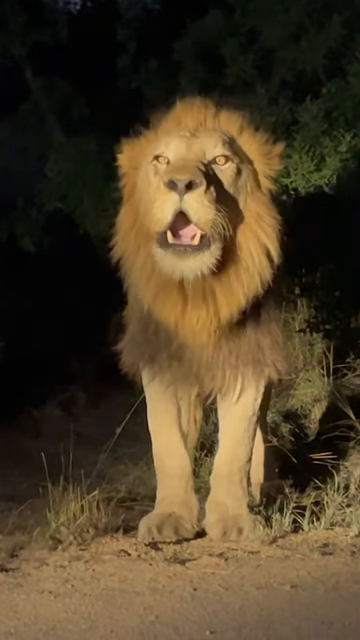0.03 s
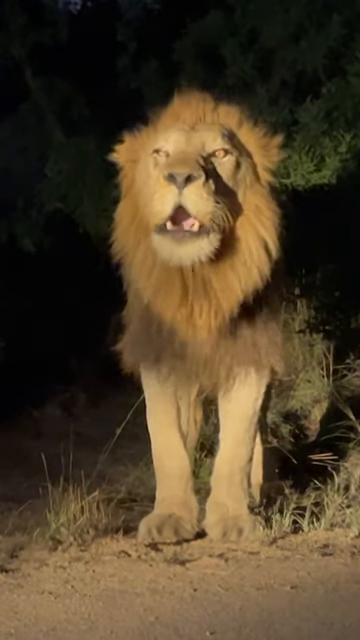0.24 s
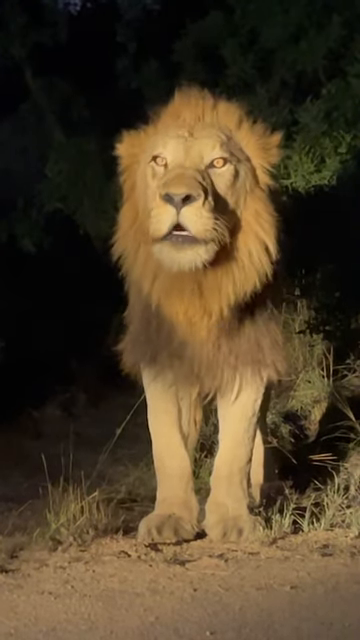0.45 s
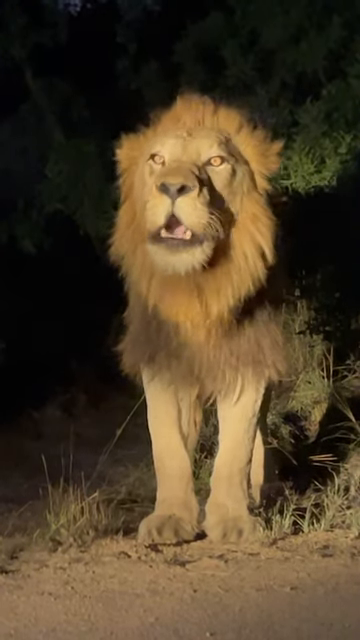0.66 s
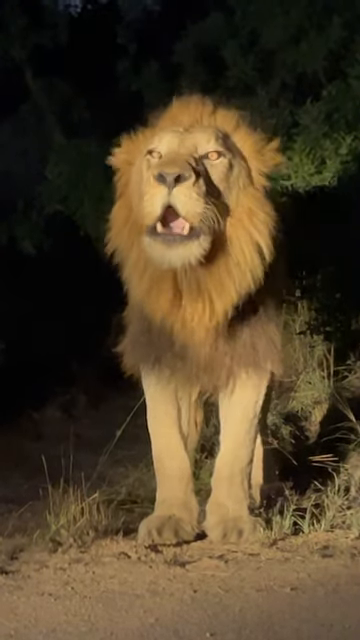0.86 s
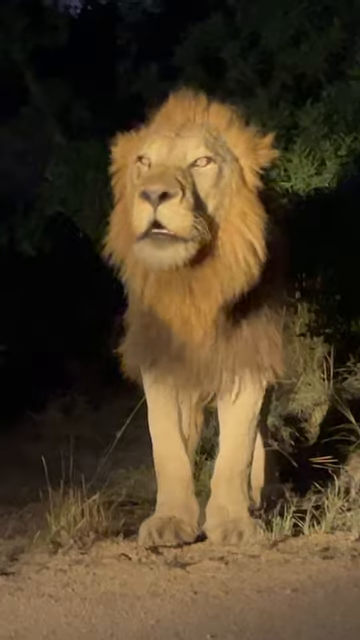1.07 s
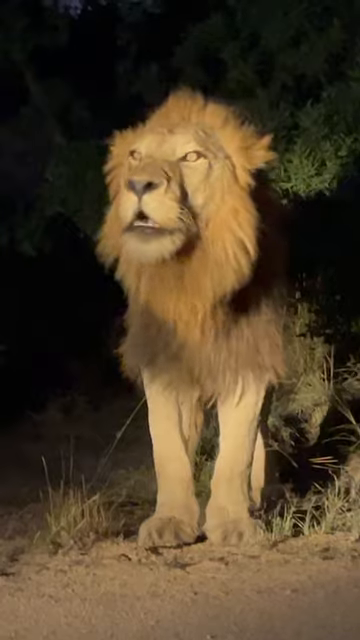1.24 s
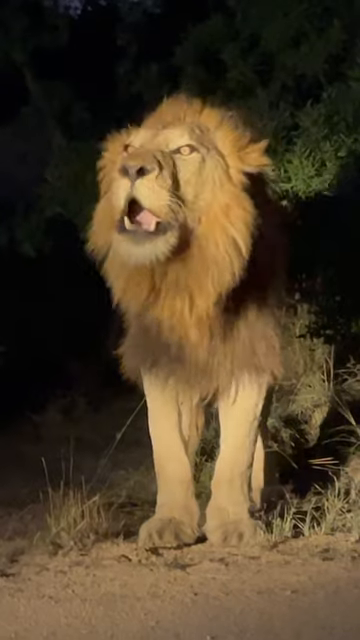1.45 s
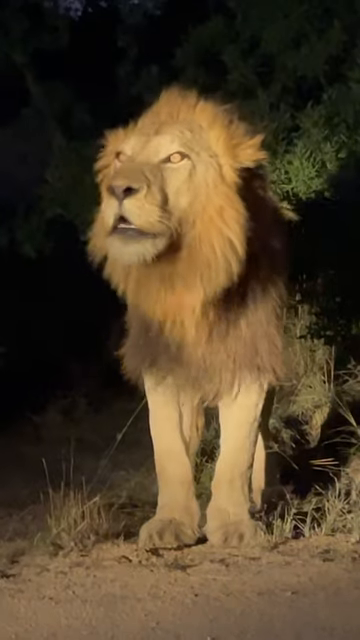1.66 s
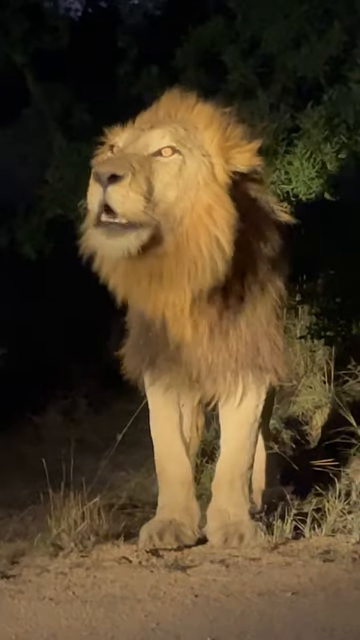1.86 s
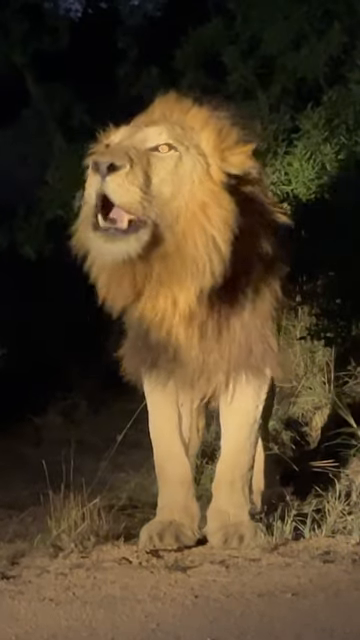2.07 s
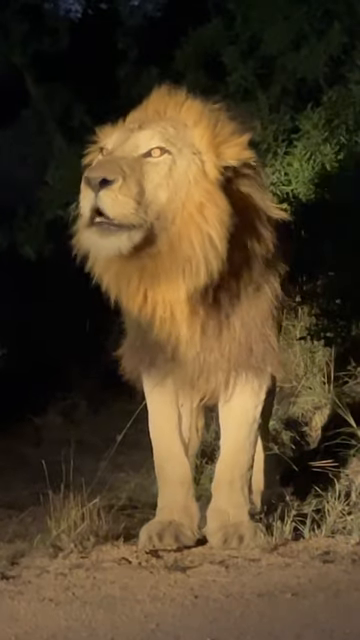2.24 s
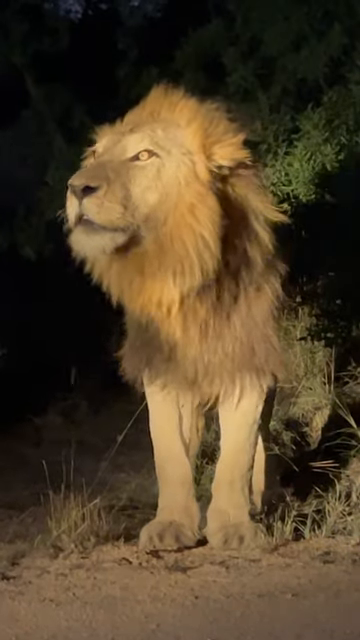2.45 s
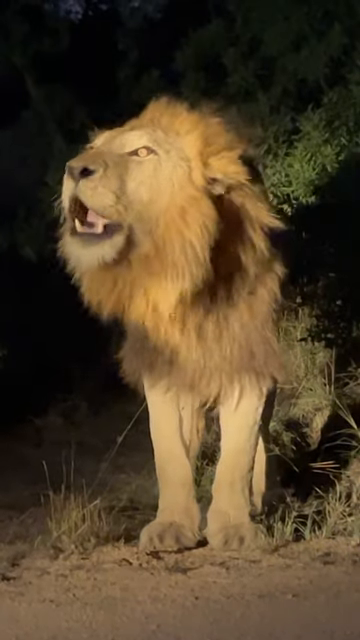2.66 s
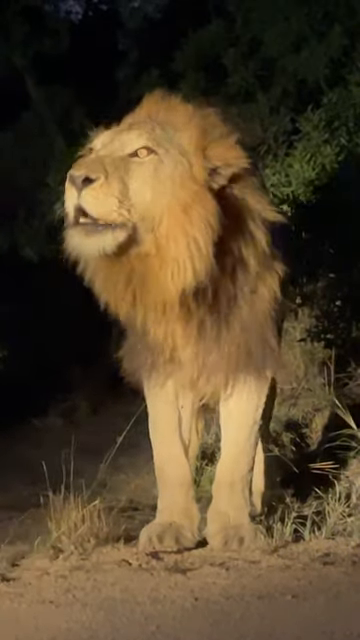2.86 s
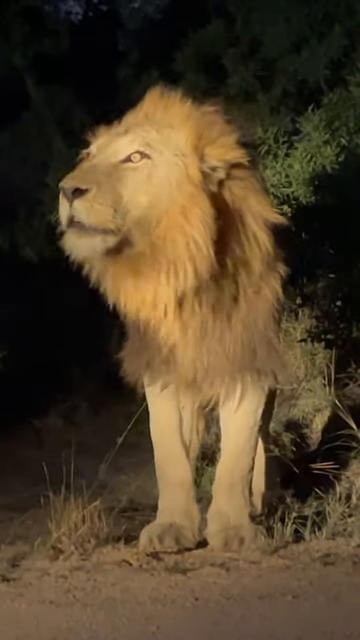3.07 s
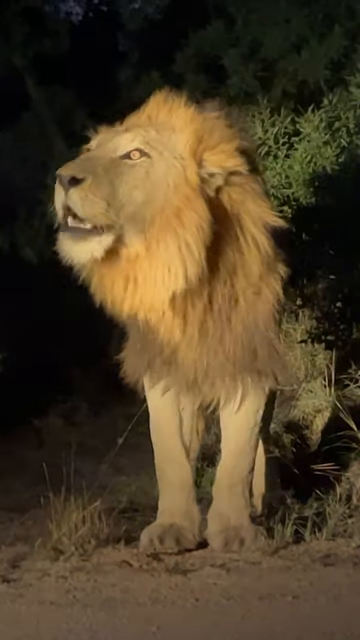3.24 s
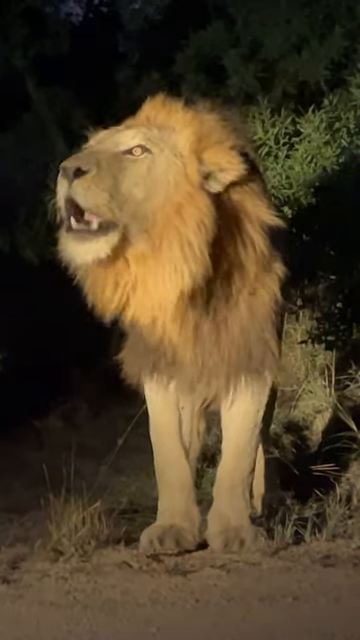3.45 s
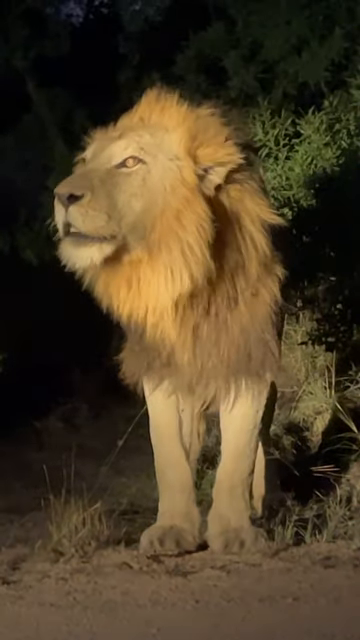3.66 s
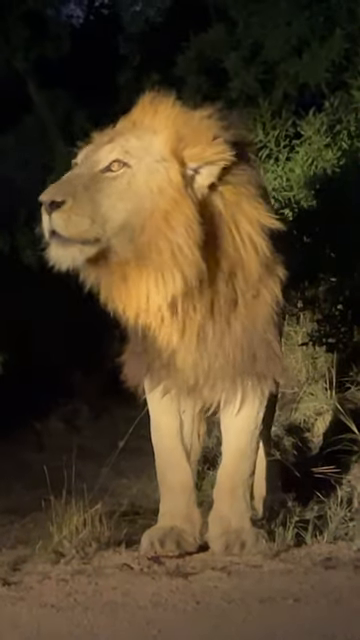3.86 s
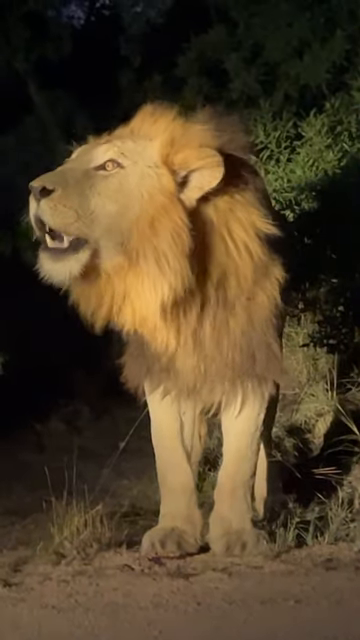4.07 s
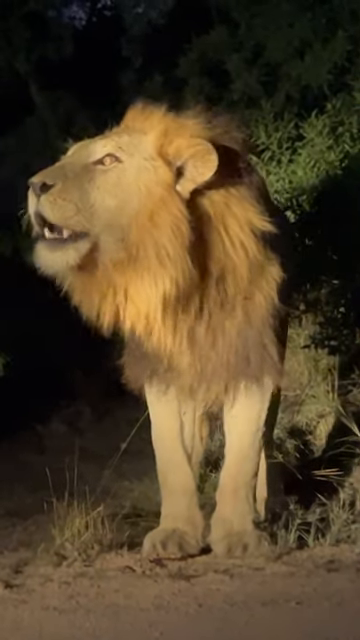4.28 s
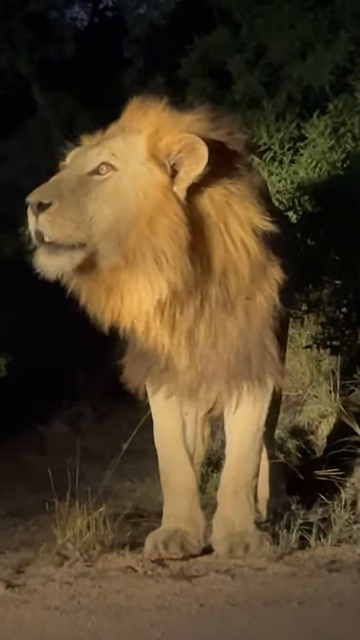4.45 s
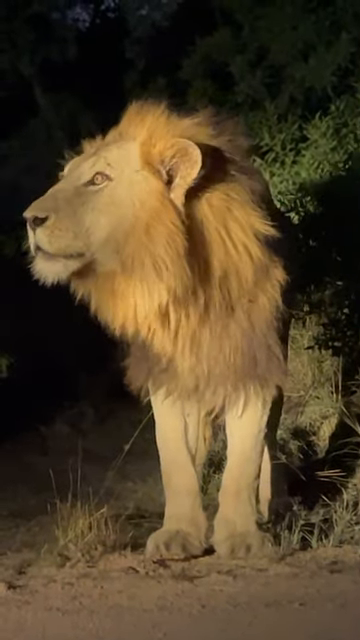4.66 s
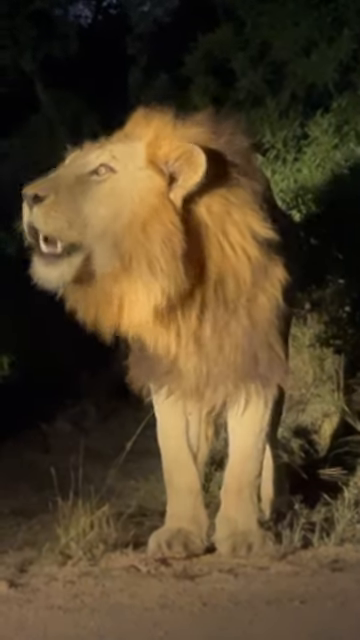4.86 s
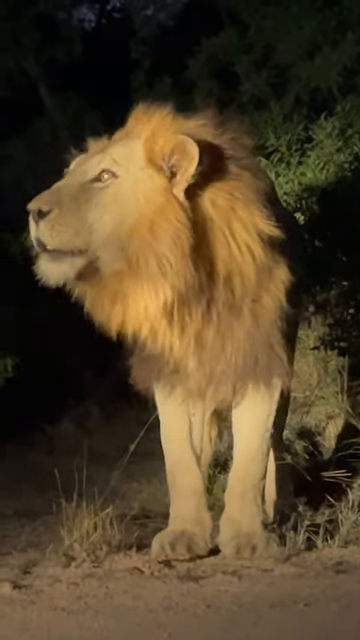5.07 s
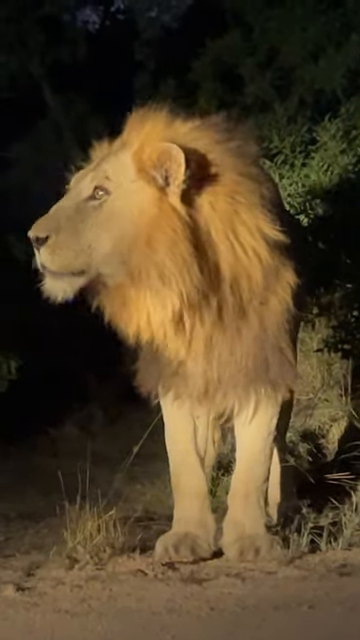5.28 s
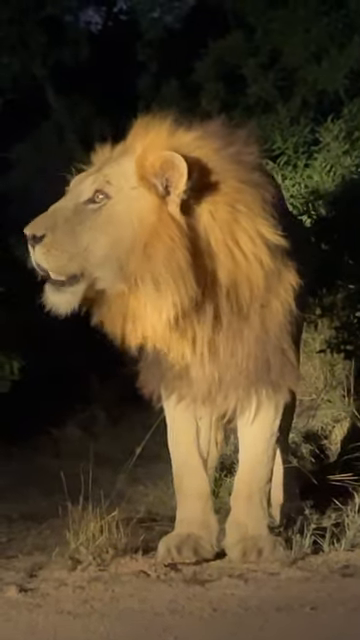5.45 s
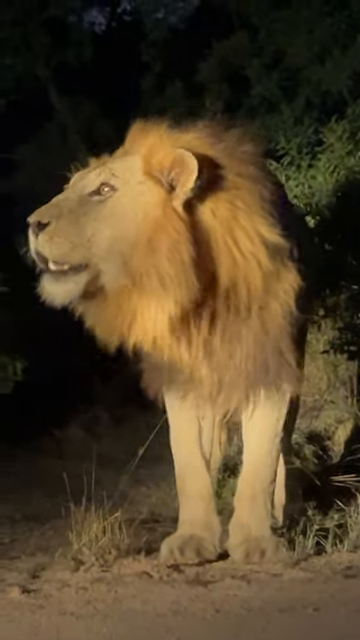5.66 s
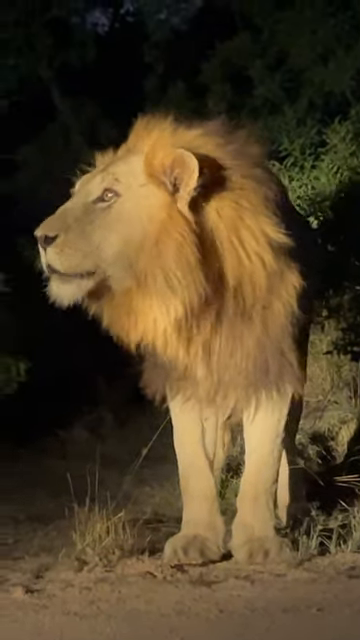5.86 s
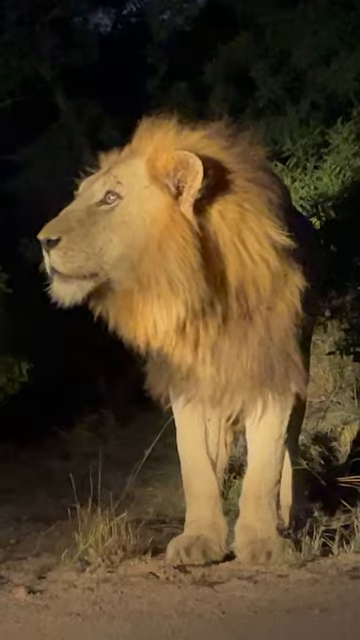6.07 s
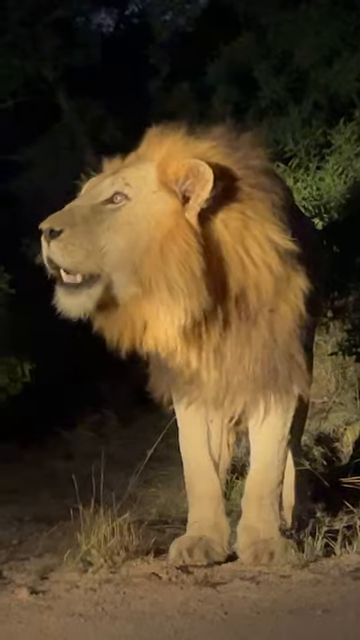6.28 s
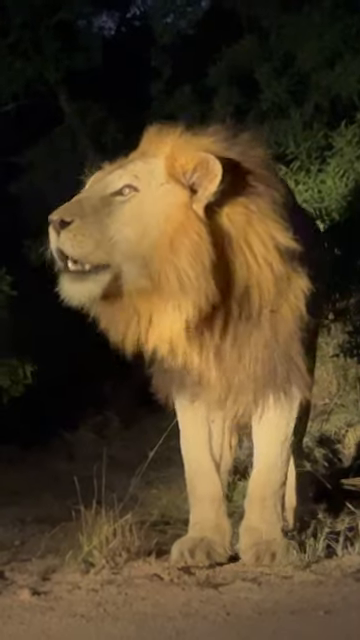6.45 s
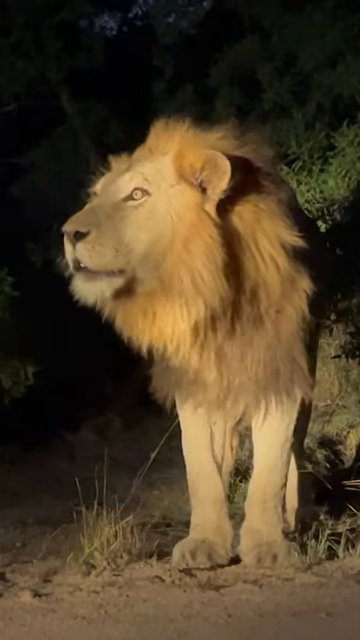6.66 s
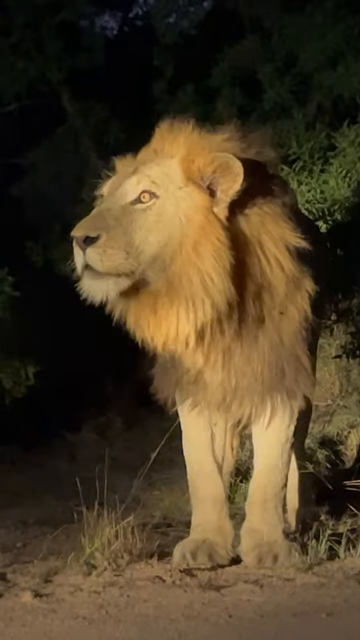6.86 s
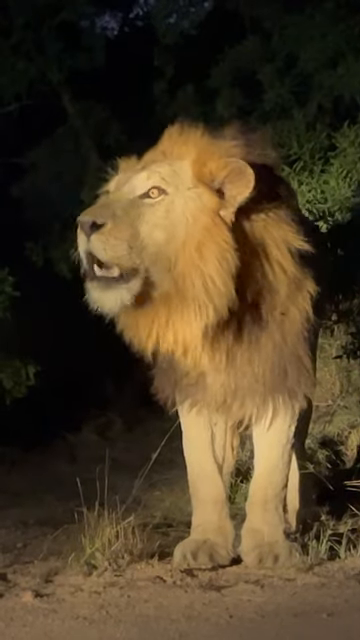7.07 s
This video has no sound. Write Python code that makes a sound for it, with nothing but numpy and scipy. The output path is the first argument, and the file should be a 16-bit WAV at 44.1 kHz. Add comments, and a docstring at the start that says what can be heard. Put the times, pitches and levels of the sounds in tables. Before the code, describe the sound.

Close stereo pickup of a lion in open bush. Powerful, almost pure low chest grunts come about every two thirds of a second, roughened by growl and rushing breath, with a short fluttering gasp drawn in before the next. The spacing widens slightly, a cluster of dull microphone bumps lands, then the last grunts are softer and more closed, with fainter gasps. Behind lie a quiet low rumble, thin insect trill and faint echo from the bush.

```python
"""In the bush at night a male lion, close by, ends a roar with a run of deep grunts that slow and weaken.
Each grunt is a falling, almost pure chest tone (a sine) with rough overtones and rushing air (shaped noise).
He gasps between most of them: noise drawn in through the throat, with a low flutter of the loose folds.
Dull knocks on the microphone are short, ringing sines. Insects trill far off over a low rumble, both made
of filtered noise, and the bush returns a faint echo made by scattered noise."""
import sys
import numpy as np
from scipy import signal
from scipy.fft import rfft, irfft
from scipy.io import wavfile
from scipy.ndimage import uniform_filter1d, minimum_filter1d

SR = 44100
rng = np.random.default_rng(int(sys.argv[2]) if len(sys.argv) > 2 else 0)


def generate_wav(sig):
    """Save sig (samples, or channels by samples) to the path in sys.argv[1] as 16-bit PCM at SR."""
    pcm = np.round(np.clip(np.atleast_2d(sig).T, -1, 1) * 32767).astype(np.int16)
    wavfile.write(sys.argv[1], SR, pcm)


N = 313992
TIME = np.arange(N) / SR   # seconds
FREQS = np.maximum(np.arange(N // 2 + 1) * SR / N, 1)   # Hz


def from_db(db):
    """Turn decibels into a gain."""
    return 10 ** (np.asarray(db) / 20)


def rms_one(x):
    """Scale to an rms (average strength) of 1."""
    return x / np.sqrt(np.mean(x ** 2) + 1e-20)


def at_freqs(points):
    """Join a table of values over Hz by straight lines on a log frequency axis."""
    hz, value = np.transpose(points)
    return np.interp(np.log(FREQS), np.log(hz), value)


def coloured(x, spectrum):
    """Weight the frequencies of x by a smooth curve in dB, then scale to rms 1."""
    return rms_one(irfft(rfft(x) * from_db(at_freqs(spectrum)), N))


def band(x, low_hz, high_hz, order=2):
    """Keep the frequencies between two limits with a Butterworth filter."""
    edges = [low_hz, min(high_hz, .45 * SR)]
    return signal.sosfilt(signal.butter(order, edges, "band", fs=SR, output="sos"), x)


def drift(rate):
    """Wander smoothly at random, with about `rate` turns a second and a spread of 1."""
    return rms_one(irfft(rfft(rng.standard_normal(N)) / (1 + (FREQS / rate) ** 2), N))


def evened(x):
    """Hold the short-term rms at 1, so that effort alone sets the level."""
    return x / np.sqrt(np.maximum(uniform_filter1d(x * x, size=1500), 1e-12))


def turbulence(phase, depth, flutter_db):
    """Air noise let through in one puff a cycle, the puffs of uneven strength."""
    puffs = (1 + np.clip(depth, 0, 1) * np.cos(phase)) ** 2
    return rms_one(rng.standard_normal(N) * puffs * from_db(flutter_db * drift(70)))


def nearest_event(rows, lead_s):
    """For each moment, the time since the current event (it takes over lead_s early) and its other columns."""
    s, *columns = np.transpose(rows)
    current = np.maximum(np.searchsorted(s - lead_s, TIME) - 1, 0)
    return [TIME - s[current]] + [c[current] for c in columns]


def night(hush_db=-68, insect_db=-72, insect_hz=6170):
    """Hush of the open bush, a low rumble and a narrow, wavering trill of far insects, all filtered noise."""
    # Tone of the hush. Each row: frequency in Hz, relative strength in dB per Hz.
    hush_colour = [(25, -2), (60, -1), (130, -5), (250, -6.5), (500, -13.5), (850, -10), (1300, -19.5),
                   (3000, -32), (8000, -41), (15000, -55)]
    # Loudness of the low, distant rumble. Each row: time in seconds, level in dB.
    rumble_levels = [(0, -46), (1.8, -57.5), (3.9, -58), (4.6, -53), (5.3, -78), (6.0, -75), (6.7, -60),
                     (7.1, -72)]
    # noise shared by both sides plus a little for each side alone
    hush_noise = rng.standard_normal(N) + 0.37 * rng.standard_normal((2, N))
    hush = from_db(hush_db) * coloured(hush_noise, hush_colour)
    rumble_db = np.interp(TIME, *np.transpose(rumble_levels))
    rumble = from_db(rumble_db) * rms_one(band(rng.standard_normal(N), 95, 175, order=4))
    trill = rms_one(band(rng.standard_normal((2, N)), insect_hz - 220, insect_hz + 220))
    waver = from_db(3.2 * drift(6.5))
    return hush + rumble + from_db(insect_db) * trill * waver


def bush(x, apart=.35):
    """Near grass scatters the treble differently to each side; far trees return a faint echo."""
    # The echo. Each row: low limit in Hz, high limit in Hz, level in dB, time to fade by 60 dB in seconds.
    echo_bands = [(60, 120, -39.5, 1), (220, 2100, -34, 0.2), (1200, 9000, -31, 0.14)]
    t = np.arange(SR) / SR
    near = band(rng.standard_normal((2, len(t))), 4000, 11000) * np.exp(-t / .014)
    response = from_db(-7) * near / np.linalg.norm(near)
    for low_hz, high_hz, db, t60 in echo_bands:
        # apart sets how much the two sides differ
        noise = rng.standard_normal(len(t)) + apart * rng.standard_normal((2, len(t)))
        scatter = band(noise, low_hz, high_hz)
        fade = from_db(-60 * t / t60) * (1 - np.exp(-t / 0.083))   # builds up, then dies away
        response = response + from_db(db) * scatter * fade / np.linalg.norm(fade)
    return signal.fftconvolve(x[None], response, axes=1)[:, :N]


def knocks(extra_hz=700, end_hz=68, sink_s=0.005, thud_s=0.027, thud_db=-6, tick_db=-30,
           rise_s=.001, port_lag_s=.0002):
    """A bump rings the case briefly, reaching the left port later; a slower thud sinks in pitch to end_hz."""
    # The bumps. Each row: time in seconds, strength in dB.
    bumps = [(0.499, -40), (4.573, -22), (4.6585, 3), (4.698, 1), (4.7835, -2), (4.8229, -2.5),
             (4.850, -3.5), (4.965, -15.5), (6.081, -46), (6.129, -45), (6.177, -46)]
    # What the bumped case rings with. Each row: frequency in Hz, typical level in dB, ring time in seconds.
    case_modes = [(418, -6, .005), (630, -8, .0065), (806, -4, 0.0054), (1044, -13, 0.0034)]
    # one row of time for each port, the left one late
    t = np.maximum(np.arange(SR // 8) / SR - port_lag_s * np.array([[1], [0]]), 0)
    size = t.shape[1]
    phase = 2 * np.pi * (end_hz * t + extra_hz * sink_s * (1 - np.exp(-t / sink_s)))
    thud_shape = np.exp(-(t / thud_s) ** 2) * (1 - np.exp(-t / 0.0023))
    thud = from_db(thud_db) * np.sin(phase) * thud_shape
    soft_contact = 1 - np.exp(-(t / rise_s) ** 2)
    # random change in dB for each bump, each mode and each port
    strengths = rng.normal(0, 2.2, (len(bumps), len(case_modes), 2, 1))
    out = np.zeros((2, N + size))
    for (s, bump_db), extra_db in zip(bumps, strengths):
        case = 0
        for (hz, db, ring_s), extra in zip(case_modes, extra_db):
            case = case + from_db(db + extra) * np.sin(2 * np.pi * hz * t) * np.exp(-(t / ring_s) ** 2)
        # bump_db counts here and again below, so harder bumps are brighter
        tick_noise = rms_one(band(rng.standard_normal(t.shape), 800, 1900))
        tick = from_db(tick_db + bump_db) * tick_noise * np.exp(-t / 0.0025)
        at = round(s * SR)
        out[:, at:at + size] += from_db(bump_db) * soft_contact * (thud + case + tick)
    return out[:, :N]


def gasp_swell(t, rise_db_per_s=290, fall_db_per_s=440):
    """Level in dB around the peak of a gasp: a steady rise, a quicker fall."""
    return np.minimum(rise_db_per_s * t, -fall_db_per_s * t)


def gasps(flutter_hz=75, flutter_lag_s=.018, stop_s=.064):
    """Air is drawn back through the throat and sets the loose folds fluttering a little after its peak."""
    # The gasps. Each row: time of the peak in seconds, air level in dB, level of the folds' flutter in dB.
    gasp_rows = [(.660, -39, -39), (1.273, -39.5, -36), (1.870, -37.5, -36), (2.556, -40, -36),
                 (3.248, -39, -36), (4.020, -36.5, -34.5), (5.440, -55, -75), (6.230, -50.5, -58),
                 (7.014, -54, -54)]
    # Tone of the gasped air. Each row: frequency in Hz, relative strength in dB per Hz.
    gasp_colour = [(150, -38), (250, -8), (550, -8.5), (641, -3.5), (1170, -12.5), (1390, -6),
                   (2020, -23.5), (2280, -18.5), (3270, -19.5), (3940, -34), (4840, -30), (7820, -37.5),
                   (8670, -42), (11800, -38), (15000, -47.5)]
    t, air_db, flutter_db = nearest_event(gasp_rows, lead_s=.3)
    gate = uniform_filter1d((t < stop_s) * 1., size=400)   # the intake stops
    phase = 2 * np.pi * np.cumsum(flutter_hz * (1 + .15 * drift(42))) / SR
    air = coloured(turbulence(phase, depth=0.13, flutter_db=2.0), gasp_colour)
    flutter = evened(band(turbulence(phase, depth=.6, flutter_db=1.5), 65, 180, order=3))
    air_gain = from_db(air_db + gasp_swell(t))
    flutter_gain = from_db(flutter_db + gasp_swell(t - flutter_lag_s))
    return gate * (air_gain * air + flutter_gain * flutter)


def grunt_controls():
    """Each grunt swells, sinks as the folds slacken, ends in a huff and trails off: pitch in Hz, 5 levels in dB."""
    # The grunts. Each row: start in seconds; then, in seconds after it, when the folds catch, the folds
    # slacken, the breath gives out and the throat closes; then top pitch in Hz and the adjustments in dB
    # of the chest tone, the chest tone once slack, the throat and the breath.
    grunt_rows = [ (0.063, .044, .144, .193, .272, 163, -0.3, 1, -1.5, -1.3),
                  (0.741, .035, .121, .175, .208, 160, 0.5, -1.2, 0, 0),
                  (1.360, .030, .094, .130, .185, 155, 1, -1.4, 0.6, 1),
                  (1.978, .028, .110, .148, .225, 158.5, 0, 0, 0, 0.8),
                  (2.647, .029, .115, .157, .226, 157.5, 0.6, -0.6, 0, 0),
                  (3.335, .033, .134, .160, .243, 158, -0.2, 0.8, -0.3, 0),
                  (4.127, .022, .130, .188, .272, 159, -0.2, 3, -0.5, -1),
                  (4.846, .029, .103, .152, .222, 151, 0, -1.8, -4.3, -5.6),
                  (5.542, .015, .095, .158, .203, 148, -0.5, -15.5, -11.5, -4.4),
                  (6.321, .012, .103, .162, .247, 149, -2.8, -9.5, -6.2, -3.6),
                  (7.094, .014, .103, .160, .230, 146, -5, -8, -2, -1)]
    # How each layer follows a grunt. Columns: peak in dB, depth below it at the start in dB, attack in
    # seconds, jump as the folds catch in dB, lift at the hardest push in dB, change as the folds slacken
    # in dB, lift of the last huff in dB, fade once the breath gives out in dB per second.
    chest_layer, throat_layer = (-3.6, 27, .018, 3, 0, -10.8, .8, 50), (-17.7, 10, .015, 6.5, 2.6, -8.3, 1.2, 165)
    rasp_layer, scrape_layer, rush_layer = (-29.8, 10, .016, 7, 2, -6.7, 3.5, 80), (-36, 19, .032, 3.5, 2.2, -3.3, 5.5, 132), (-38.8, 18, .028, 3.5, 1.2, -4,
                                                                          6.5, 200)
    catch_takes_s, slacken_takes_s = .002, .016   # how quickly the folds begin to clap, and slacken
    push_s, push_width_s = .075, .024   # the hardest push
    huff_early_s, huff_width_s = .005, .02   # the last huff, just before the breath gives out
    pitch_hold_s, rest_hz = .06, 62   # the pitch holds, then sinks towards that of the resting folds
    pitch_sag, slack_drop = .68, .18   # e-foldings of that fall per breath; share lost on slackening
    weak_late_s_per_db = .0019   # in a weak grunt the chest tone starts late
    close_db_per_s = 250   # the voice dies as the throat closes

    (t, catch_s, tight_s, breath_s, close_s, top_hz, chest_db, slack_chest_db,
     throat_db, breath_db) = nearest_event(grunt_rows, lead_s=.1)
    uncaught = .5 - .5 * np.tanh((t - catch_s) / catch_takes_s)
    push = np.exp(-((t - push_s) / push_width_s) ** 2)
    slackened = .5 + .5 * np.tanh((t - tight_s) / slacken_takes_s)
    huff = np.exp(-((t - breath_s + huff_early_s) / huff_width_s) ** 2)
    spent_s = np.maximum(t - breath_s, 0)
    closed_db = close_db_per_s * np.maximum(t - close_s, 0)
    sag = np.exp(-pitch_sag * np.maximum(t - pitch_hold_s, 0) / breath_s)
    pitch = rest_hz + (top_hz - rest_hz) * sag * (1 - slack_drop * slackened)

    def level(layer, late_s=0):
        """Follow the grunt with one layer's settings and give its level in dB."""
        peak_db, start_db, attack_s, catch_db, push_db, slack_db, huff_db, fade = layer
        attack = start_db * np.exp((late_s - t) / attack_s) + catch_db * uncaught
        lift = push_db * push + slack_db * slackened + huff_db * huff
        return peak_db - attack + lift - fade * spent_s - closed_db

    chest = level(chest_layer, late_s=-weak_late_s_per_db * throat_db)
    chest = chest + chest_db + slack_chest_db * slackened
    throat = level(throat_layer) + throat_db
    rasp = level(rasp_layer) + (throat_db + breath_db) / 2
    return pitch, chest, throat, rasp, level(scrape_layer) + breath_db, level(rush_layer) + breath_db


def resonate(x, modes, wander_db=0):
    """Parallel resonances with alternating signs; each swells and fades as tongue and jaw move."""
    out = 0
    for k, (hz, width, db) in enumerate(modes):
        r = np.exp(-np.pi * width / SR)
        poles = [1, -2 * r * np.cos(2 * np.pi * hz / SR), r * r]
        gain = (-1) ** k * from_db(db + wander_db * drift(17)) * (1 - r * r) / 2
        out = out + gain * signal.lfilter([1, 0, -1], poles, x)
    return out


def windpipe(x, round_trip_s=.0028, stretch=.04, reflection=.5):
    """Sound runs up and down a tube of changing length, which gives it narrow, moving peaks."""
    lag = SR * round_trip_s * (1 + stretch * drift(6.6))
    n = np.arange(N)
    out = 0
    for k in range(4):
        heard_from = np.clip(n - np.round(k * lag).astype(int), 0, N - 1)
        out = out + np.clip(reflection, 0, .8) ** k * x[heard_from]
    return rms_one(out)


def rushing_air(phase):
    """Breath noise, gently pulsed by the folds, is coloured by the windpipe."""
    # Tone of the rushing air. Each row: frequency in Hz, relative strength in dB per Hz.
    air_colour = [(2800, -23), (3600, .5), (4000, -3.5), (4350, -6), (4850, -2), (5400, -2.5), (6000, -9.5),
                  (7700, -7), (9000, -14.5), (10200, -12), (12000, -11.2), (14000, -23), (15700, -20)]
    air = windpipe(turbulence(phase, depth=.25, flutter_db=1.4), stretch=.035, reflection=.5)
    return rms_one(band(coloured(air, air_colour), 1800, 18000))


def rasp_and_scrape(phase, pulses, slack):
    """The mouth rings with fold pulses and rough air, giving a low rasp and a high scrape."""
    # Resonances of the mouth. Each row: frequency in Hz, width in Hz, relative level in dB.
    mouth_modes = [(1370, 170, 4), (1600, 120, 2.5), (1770, 90, -6), (2280, 140, -1.5), (2735, 120, -5),
                   (3000, 90, -3), (3400, 300, -7.5), (3680, 60, -15)]
    # slack folds rattle the air stream more coarsely
    rattle = turbulence(phase, depth=.5, flutter_db=1.8 + 1.4 * slack)
    source = .3 * pulses + windpipe(band(rattle, 900, 4200), reflection=0.44)
    mouth = resonate(source, mouth_modes, wander_db=2.5)
    rasp = evened(band(mouth, 1230, 1880, order=3))
    scrape = evened(band(mouth, 2020, 3650, order=3))
    return rasp, scrape


def throat_growl(phase, pulses, closing, slack):
    """Fold pulses and rough air ring the long throat, whose resonances change as the jaw half shuts."""
    # Resonances of the throat. Each row: frequency in Hz, width in Hz, relative level in dB.
    wide_modes, narrow_modes = [(340, 47, 0), (394, 59, 1.5), (470, 85, 1.8), (570, 160, -2.5),
                                (745, 105, 1), (895, 160, -7), (1036, 45, -1)], [(270, 80, -12.5), (390, 110, -15), (560, 70, -8),
                                                  (760, 80, -7), (870, 80, 0), (1045, 80, 1.5)]
    # How far the jaw shuts. Each row: time in seconds, position (0 = wide, 1 = half shut).
    jaw_path = [(4.1, 0), (4.9, .15), (5.5, .82), (6.7, .85), (7.05, .4)]
    rough = .6 + .4 * slack
    source = pulses + rough * rms_one(band(turbulence(phase, depth=.45, flutter_db=2.5), 150, 3600))
    source = source / np.hypot(closing, rough)
    narrow = np.clip(np.interp(TIME, *np.transpose(jaw_path)), 0, 1)
    wide_sound = (1 - narrow) * resonate(source, wide_modes, wander_db=2.0)
    narrow_sound = narrow * resonate(source, narrow_modes, wander_db=1.5)
    return evened(band(wide_sound + narrow_sound, 140, 1120, order=4))


def chest_tone(phase, slack, octave_db=-17):
    """Heavy vocal folds swing almost as a sine, with a low rumble of pulsed air."""
    shimmer_db = .3 + 1.4 * slack   # unsteadiness of the loudness
    rumble = rms_one(band(turbulence(phase, depth=.3, flutter_db=1.0), 47, 220, order=5))
    # slack folds swing lopsidedly, which adds an unsteady octave
    octave = slack * from_db(octave_db + 1.7 * drift(25)) * np.sin(2 * phase)
    tone = np.sqrt(2) * (np.sin(phase) + octave) * from_db(shimmer_db * drift(60))
    return tone + from_db(-23 + 6 * slack) * rumble


def grunts(slack_hz=108, tight_hz=150, full_voice_db=11):
    """As the pitch sinks the vocal folds slacken and beat unevenly; they drive five layers of sound."""
    pitch, chest_db, throat_db, rasp_db, scrape_db, air_db = grunt_controls()
    slack = np.clip((tight_hz - pitch) / (tight_hz - slack_hz), 0, 1)   # 0 = tight, 1 = slack
    jitter = .011 + .035 * slack   # unsteadiness of the pitch, as a share of it
    phase = 2 * np.pi * np.cumsum(pitch * (1 + jitter * drift(60))) / SR
    # the folds clap shut only when they swing wide, so each grunt begins as bare air
    closing = np.clip((chest_db - throat_db) / full_voice_db, 0, 1) ** 2
    overtones = sum(np.cos(k * phase) for k in range(2, 24))
    pulses = closing * rms_one(overtones * from_db(2.0 * drift(90)))
    rasp, scrape = rasp_and_scrape(phase, pulses, slack)
    # each layer follows its own level
    voice = from_db(chest_db) * chest_tone(phase, slack)
    voice = voice + from_db(throat_db) * throat_growl(phase, pulses, closing, slack)
    voice = voice + from_db(rasp_db) * rasp + from_db(scrape_db) * scrape
    return voice + from_db(air_db) * rushing_air(phase)


def scene():
    """Add up the lion straight ahead, his echo, the knocks and the night."""
    lion = grunts() + gasps()
    return lion + bush(lion) + knocks() + night()


def record(dry, ceiling=0.97, cutoff_hz=15700):
    """Two ports hear each pitch at shifted phases; a fast limiter holds the peaks; the top is cut."""
    # Lead of the left port over the right. Each row: frequency in Hz, phase in radians.
    port_phase = [(20, -.24), (190, -.24), (300, 0), (450, -.25), (620, .5), (1050, -.5), (1300, 0),
                  (2000, 0), (3000, .6), (5200, .5), (5800, -1.6), (6800, -.6), (7700, -2.5),
                  (12600, -6.28)]
    fade_out = np.minimum(1, (TIME[-1] - TIME) / .004)
    # half of the lead goes to each side
    shift = np.exp(.5j * at_freqs(port_phase) * np.array([[1], [-1]]))
    x = irfft(rfft(dry * fade_out) * shift, N)
    allowed = np.minimum(1, ceiling / (np.abs(x).max(axis=0) + 1e-9))
    x = x * uniform_filter1d(minimum_filter1d(allowed, size=121), size=121)
    return signal.sosfilt(signal.ellip(10, .2, 80, cutoff_hz, fs=SR, output="sos"), x)


dry = scene()
out = record(dry)
generate_wav(out)
```